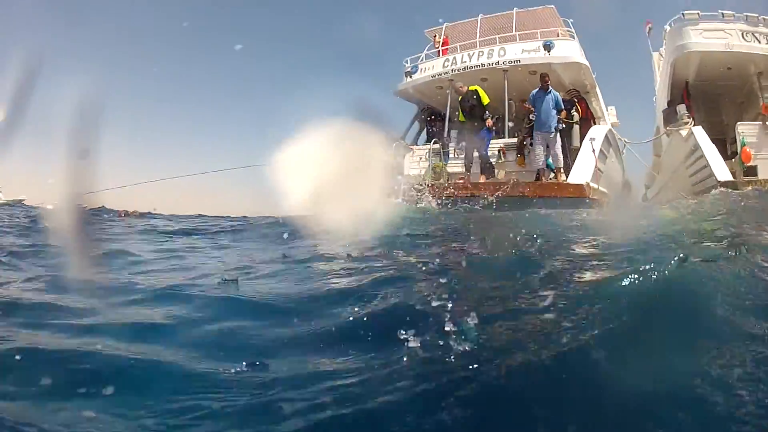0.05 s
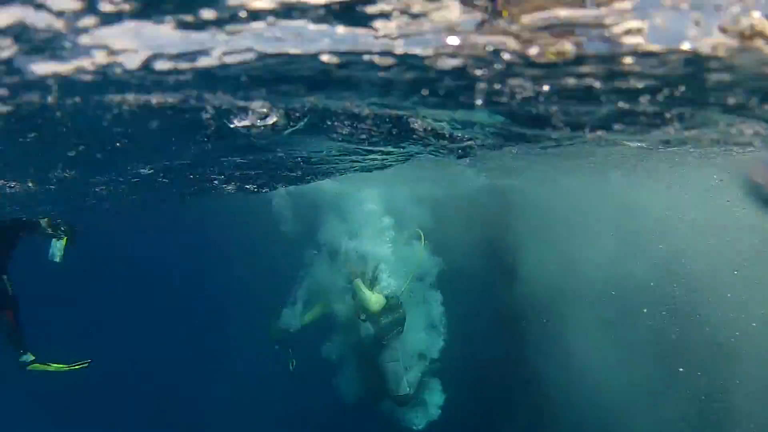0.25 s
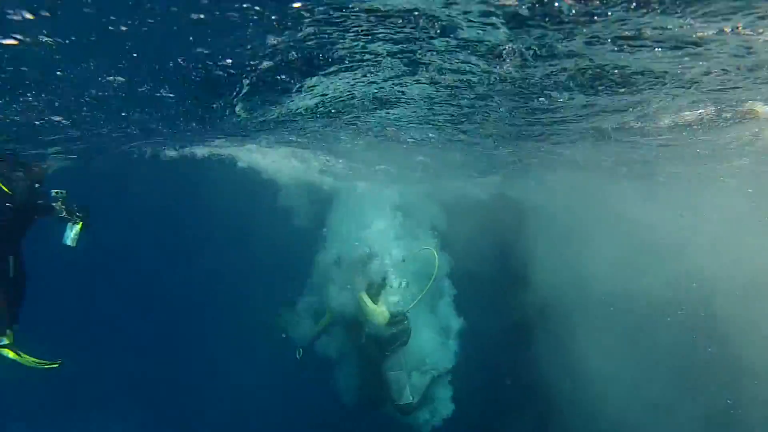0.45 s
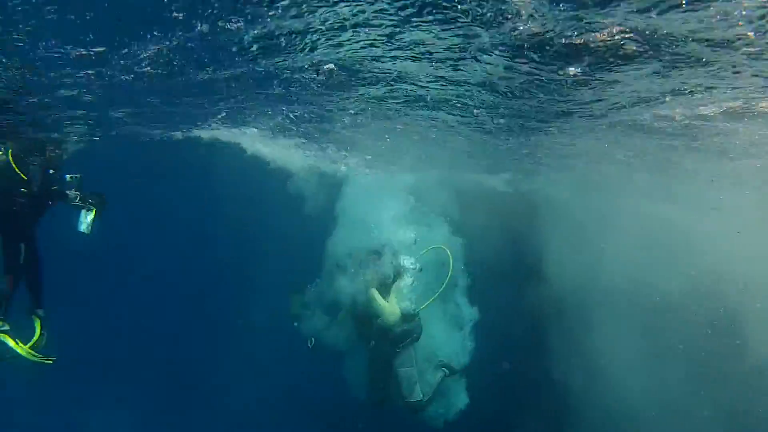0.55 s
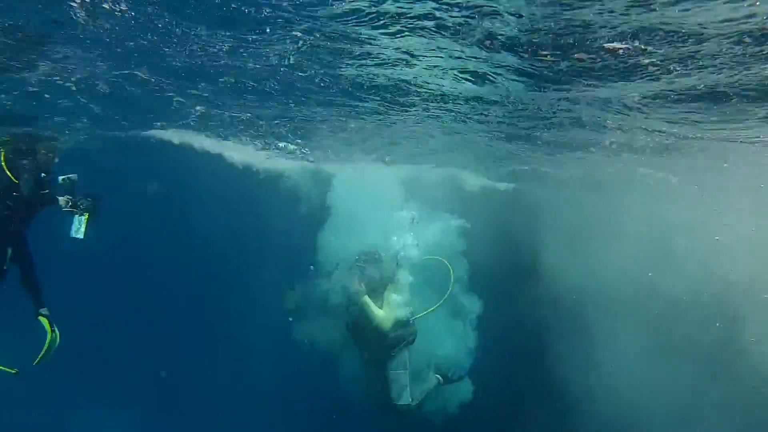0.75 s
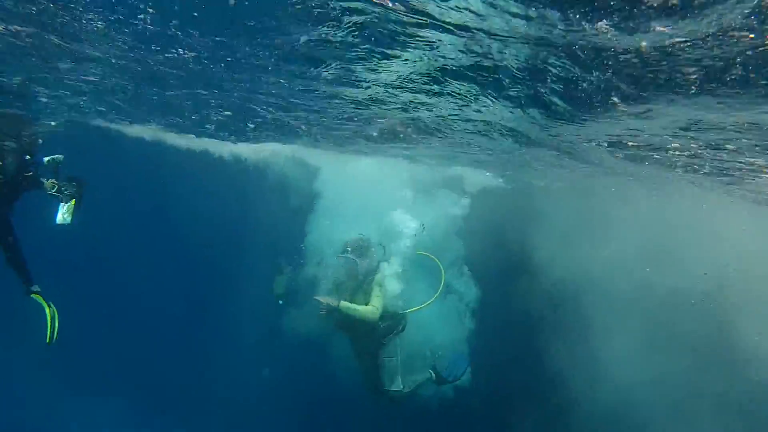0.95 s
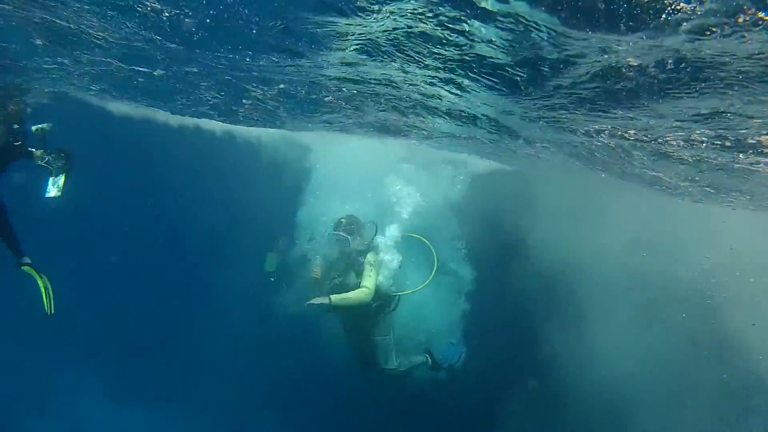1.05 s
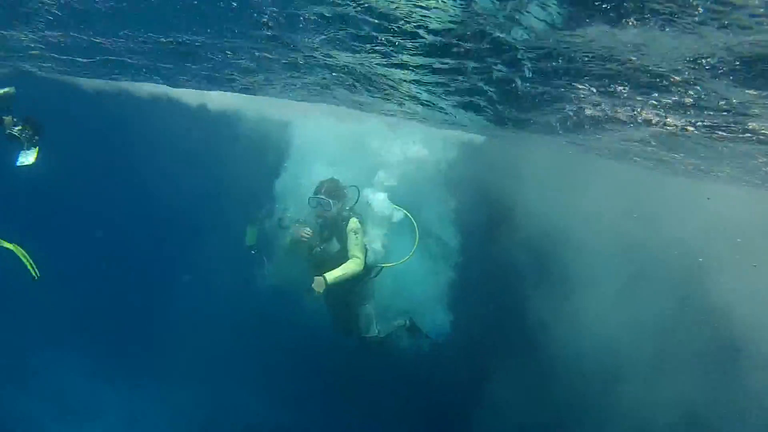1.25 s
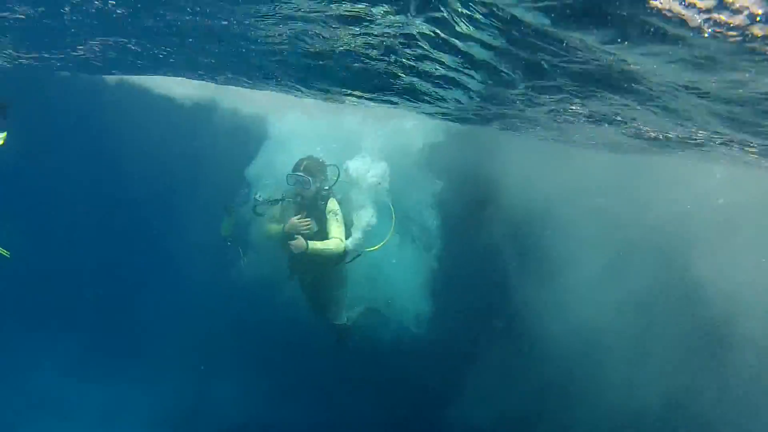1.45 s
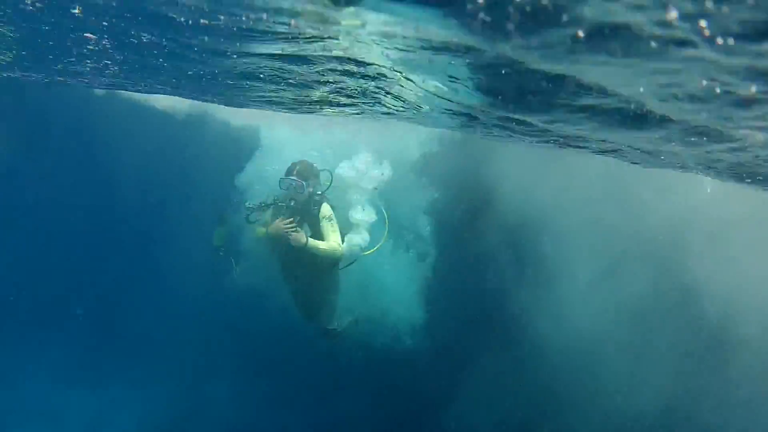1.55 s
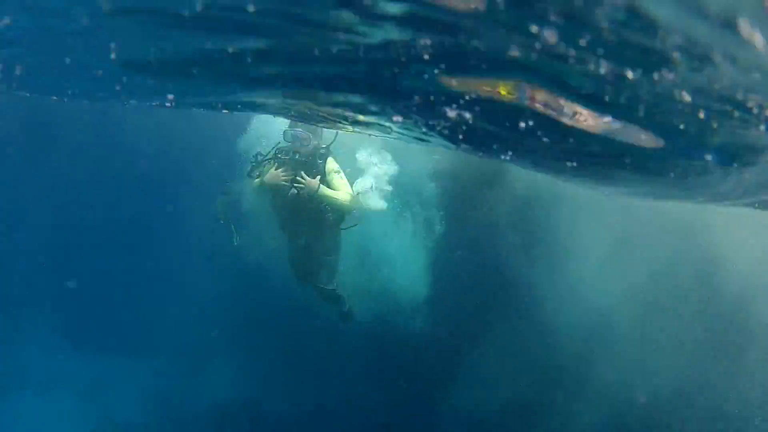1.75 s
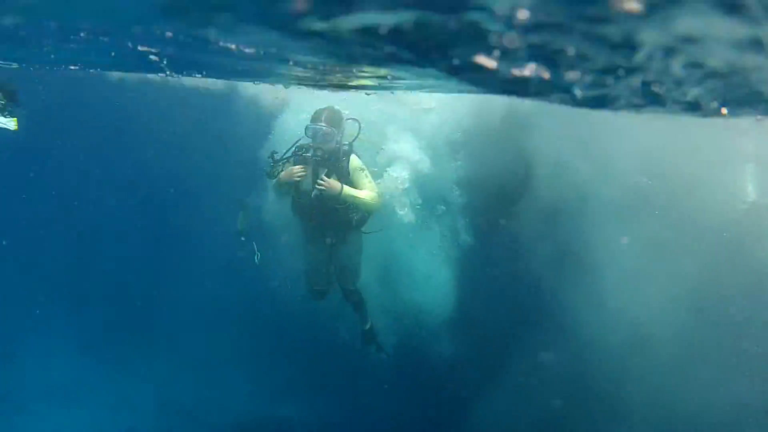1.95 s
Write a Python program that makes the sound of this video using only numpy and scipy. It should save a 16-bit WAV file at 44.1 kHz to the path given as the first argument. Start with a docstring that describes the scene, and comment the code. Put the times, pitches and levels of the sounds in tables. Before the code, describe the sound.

A splashing gurgle of sea water closes over a waterproof camera as a diver plunges in nearby. Close slaps and ringing bubbles die away into faint underwater hiss and rumble, with stray bubbles and one hollow knock.

```python
"""Underwater camera beside a diver's plunge.

A camera in a watertight housing dips under the sea as a diver plunges in nearby. Water slaps the
housing and closes over it in a gurgle of ringing air bubbles; then come a faint underwater hiss,
a few stray bubbles and one knock. The recorder's coarse sampling adds a glassy sheen."""
import sys
import numpy as np
from scipy import signal
from scipy.fft import rfft, irfft
from scipy.io import wavfile
from scipy.ndimage import map_coordinates

SR = 44100
rng = np.random.default_rng(int(sys.argv[2]) if len(sys.argv) > 2 else 0)


def pcm_store(signal):
    """Save signal as 16-bit PCM."""
    levels = np.round(np.clip(np.atleast_2d(signal), -1, 1) * 32767)
    wavfile.write(sys.argv[1], SR, levels.astype(np.int16).T)


N = 88200


def amp(db):
    """Decibels to gain."""
    return 10 ** (np.asarray(db) / 20)


def unit_rms(x):
    """x at rms 1."""
    return x / np.sqrt(np.mean(x ** 2) + 1e-20)


def decay(t, t60_s):
    """Exponential fall, 60 dB in t60_s."""
    return amp(-60 * t / t60_s)


def gain_at(colour, hz):
    """Gain of a spectrum table, interpolated on a log frequency axis."""
    knots_hz, db = np.transpose(colour)
    return amp(np.interp(np.log(hz + 1), np.log(knots_hz + 1), db))


def curves(rows):
    """One value per sample for each column after the time."""
    times_s, *columns = np.transpose(rows)
    return [np.interp(np.arange(N) / SR, times_s, column) for column in columns]


def wobble(rate_hz):
    """Smooth random curve, rate_hz knots a second."""
    knots = rng.standard_normal(int(N * rate_hz / SR) + 4)
    return map_coordinates(knots, [np.arange(N) * rate_hz / SR])


def noise(colour):
    """Coloured noise at rms 1."""
    white = rfft(rng.standard_normal(N))
    return unit_rms(irfft(white * gain_at(colour, np.fft.rfftfreq(N, 1 / SR)), N))


def add(track, start_s, sound):
    """Mix a sound into the track."""
    part = track[max(0, round(start_s * SR)):][:len(sound)]
    part += sound[:len(part)]


def bubble(hz, attack_s, t60_s, glide):
    """One air bubble swells and rings down as its pitch glides."""
    t = np.arange(int((t60_s + 2 * attack_s) * SR) + 2) / SR
    envelope = (1 - np.exp(-(t / attack_s) ** 2)) * decay(t, t60_s)
    pitch_hz = hz * (1 + glide * np.minimum(t / t60_s, 1))
    return envelope / envelope.max() * np.sin(2 * np.pi * np.cumsum(pitch_hz) / SR)


# Single bubbles: (time [s], pitch [Hz], level [dB], attack [s], t60 [s], glide [fraction of pitch])
BUBBLES = [(0.2092, 678, -23.5, 0.00068, 0.027, 0.34), (0.2376, 838, -1.5, 0.00073, 0.014, -0.21),
           (0.245, 2320, -22, 0.00059, 0.021, -0.18), (0.2457, 5040, -13.5, 0.00013, 0.0072, -0.17),
           (0.273, 737, -16, 0.00019, 0.02, 0.33), (0.2962, 2170, -10.5, 0.0006, 0.02, -0.074),
           (0.316, 2213, -6, 0.0043, 0.01, -0.1), (0.3402, 670, -4, 0.0027, 0.026, 0.044),
           (0.345, 512, -16.5, 0.0011, 0.082, -0.05), (0.3802, 377, -23.5, 0.00047, 0.14, -0.074),
           (0.383, 2050, -13, 0.011, 0.014, 0.11), (0.3859, 2990, -5, 0.00041, 0.0046, -0.12),
           (0.3915, 3730, -25.5, 0.0083, 0.02, -0.1), (0.3956, 770, -20, 0.00084, 0.01, 0.24),
           (0.4331, 678, -18.5, 0.0047, 0.034, 0.23), (0.4414, 2150, -15, 0.005, 0.014, 0.02),
           (0.46, 1920, -14, 0.0017, 0.0049, 0.16), (0.47, 1485, -20.5, 0.0068, 0.017, 0.073),
           (0.4785, 392, -20, 0.002, 0.11, -0.00032), (0.497, 1410, -22, 0.0026, 0.021, 0.051),
           (0.4972, 518.7, -17, 0.0003, 0.1, 0.059), (0.509, 416, -11, 0.0016, 0.035, -0.37),
           (0.5178, 570, -10, 0.0045, 0.014, 0.17), (0.5304, 1544, -4.5, 0.0029, 0.0063, 0.06),
           (0.5347, 868, -16, 0.00048, 0.03, 0.28), (0.5404, 3505, -15.5, 0.0011, 0.0086, 0.09),
           (0.559, 5290, -20.5, 0.0022, 0.018, -0.084), (0.56, 1426, -20, 0.00037, 0.056, -0.057),
           (0.5708, 591, -16.5, 0.0056, 0.051, 0.1), (0.5746, 426, -11.5, 0.0011, 0.07, -0.059),
           (0.6033, 510, -20, 0.00031, 0.035, 0.44), (0.6132, 3780, -19.5, 0.00033, 0.025, -0.1),
           (0.629, 650, -22, 0.00088, 0.098, 0.3), (0.6685, 670, -15, 0.00043, 0.032, -0.17),
           (0.669, 2360, -28, 0.00066, 0.016, 0.046), (0.6786, 530, -19.5, 0.008, 0.039, -0.11),
           (0.7026, 899, -16, 0.00088, 0.086, -0.0088), (0.7065, 505, -17, 0.00035, 0.036, -0.14),
           (0.7335, 2410, -21.5, 0.00028, 0.016, 0.04), (0.7592, 1610, -25, 0.0072, 0.014, 0.28),
           (0.7878, 497.6, -21, 0.0048, 0.057, 0.44), (0.793, 1280, -35, 0.006, 0.036, -0.12),
           (0.884, 447, -39.5, 0.0064, 0.11, 0.33), (0.9038, 2440, -28, 0.00046, 0.033, -0.09),
           (1.0008, 1482, -19, 0.0007, 0.065, 0.0035), (1.0003, 629, -29.5, 0.00039, 0.066, 0.098),
           (0.9992, 1747, -29.5, 0.0005, 0.085, 0.056), (1.0355, 604, -37.5, 0.0035, 0.23, -0.092),
           (1.134, 876, -42, 0.001, 0.062, 0.05), (1.5216, 575, -27, 0.0039, 0.082, 0.041),
           (1.566, 3420, -42, 0.00072, 0.0066, -0.22), (1.5844, 2900, -39.5, 0.00034, 0.0099, -0.47),
           (1.659, 1080, -44.5, 0.0004, 0.021, -0.1), (1.8885, 964, -33, 0.00059, 0.077, 0.25),
           (1.889, 3660, -39, 0.00066, 0.024, -0.0027)]
FLUTTER_HZ, FLUTTER_DB, FLUTTER_PITCH_FRACTION = 141, 2.07, 0.018


def large_bubbles():
    """Air pinches off in plops and blips that waver in level and pitch in the churning water."""
    out = np.zeros(N)
    for start_s, hz, db, attack_s, t60_s, glide in BUBBLES:
        ring = bubble(hz, attack_s, t60_s, glide)
        n = np.arange(len(ring))
        level_flutter, pitch_flutter = (map_coordinates(knots, [n * FLUTTER_HZ / SR], mode="mirror")
                                        for knots in rng.standard_normal((2, 64)))
        wavering = np.interp(n + FLUTTER_PITCH_FRACTION * np.cumsum(pitch_flutter), n, ring)
        add(out, start_s, amp(db + FLUTTER_DB * level_flutter) * wavering)
    return out


def swarm(per_s, centre_hz, log_spread, cycles):
    """Small bubbles of random size ring for roughly equal numbers of cycles; rms 1."""
    out = np.zeros(N)
    for when, pitch_rank, strength, life in rng.random((int(per_s * N / SR), 4)):
        hz = centre_hz * np.exp(log_spread * 2 * np.arcsin(2 * pitch_rank - 1) / np.sqrt(2))
        db = -5 * np.log(max(strength, .04))
        ring = bubble(hz, attack_s=1 / hz, t60_s=cycles * (.5 + life) / hz, glide=0.18)
        add(out, when * N / SR, amp(db) * ring)
    return unit_rms(out)


# Cloud of small bubbles: (time [s], gurgle level [dB], fizz level [dB])
CLOUD = [(.14, -77, -61), (.22, -49.5, -44), (.27, -42, -49), (.33, -40.5, -38), (.39, -36, -31.5),
         (.42, -34.5, -46), (.46, -35.5, -32), (.55, -28, -39), (.63, -38, -36.5), (.69, -27, -57),
         (.73, -36.5, -60.5), (.78, -37.5, -74.5), (.83, -49, -73), (1.3, -71, -75), (1.65, -57, -74),
         (2, -65.5, -68)]
# Froth spectrum: (frequency [Hz], relative density [dB])
FROTH_COLOUR = [(500, -18), (1400, 1.5), (2300, 5.5), (5500, -15)]
# Churning water spectrum: (frequency [Hz], relative density [dB])
WASH_COLOUR = [(100, -12), (400, 9), (1500, -11.5), (3000, -16.5), (5800, -6.5)]
FROTH_ROUGH_DB, WASH_ROUGH_DB = 6, 5.4


def bubble_cloud():
    """Air dragged down with the housing breaks into a frothy gurgle and fizz over a churning wash."""
    gurgle_db, fizz_db = curves(CLOUD)
    gurgle = amp(gurgle_db) * swarm(per_s=480, centre_hz=837.5, log_spread=0.374, cycles=21.8)
    froth_db = np.minimum(gurgle_db - 12.5, fizz_db + 6.5)
    froth = amp(froth_db + FROTH_ROUGH_DB * wobble(300)) * noise(FROTH_COLOUR)
    fizz = amp(fizz_db) * swarm(per_s=800, centre_hz=2740, log_spread=0.383, cycles=20)
    wash = amp(fizz_db - 3.5 + WASH_ROUGH_DB * wobble(91.96)) * noise(WASH_COLOUR)
    return gurgle + froth + fizz + wash


# Ring of the air pocket: (time [s], pitch [Hz], level [dB])
POCKET = [(.36, 353, -64), (.385, 370.8, -35), (.44, 361.3, -30.5), (.52, 389.3, -43), (.58, 420.1, -40.5),
          (.66, 423.6, -28), (.7, 475, -33.5), (.77, 487.6, -40), (.83, 526, -50)]
POCKET_FLUTTER_DB, POCKET_WANDER_FRACTION = 3.5, 0.022


def air_pocket():
    """A large air pocket, shaken by the flow, rings unsteadily and rises in pitch as it shrinks."""
    hz, db = curves(POCKET)
    t = np.arange(N) / SR
    alive = (t > POCKET[0][0]) & (t < POCKET[-1][0])
    phase = 2 * np.pi * np.cumsum(hz * (1 + POCKET_WANDER_FRACTION * wobble(70.9))) / SR
    return alive * amp(db + POCKET_FLUTTER_DB * wobble(59.94)) * np.sin(phase)


# Slaps on the housing: (time [s], relative ring level [dB], relative crack level [dB], cutoff [Hz])
SLAPS = [(.036, -45, -33, 6200), (0.147, -23.5, -21, 4530), (0.1665, -19, -20, 5050),
         (0.2395, -15, -18, 2700), (0.298, -18, -28.5, 4000), (0.3178, -30, -12.5, 5950),
         (0.3857, -23, -14.5, 5730), (0.4014, -24, -19.5, 5000), (0.4431, -29.5, -17.5, 5970),
         (0.4556, -18.5, -16.5, 4970), (.64, -26.5, -26.5, 4900), (0.5292, -11, -10, 5500),
         (0.561, -21.5, -22, 6000), (0.6427, -27, -23, 5260), (.659, -19.5, -26.5, 4000),
         (0.672, -22.5, -25, 3550), (0.704, -22, -26, 6100), (.7598, -31, -32, 2260),
         (0.7901, -30, -20, 1410), (0.839, -33, -34.5, 2580), (.904, -26, -22, 2720),
         (1.0008, -31.5, -25.5, 1470), (1.1322, -36, -36, 1880), (1.6589, -38, -39, 3520),
         (1.724, -51.5, -40, 3000), (1.88, -39, -40.5, 3060)]
# Housing modes: (frequency [Hz], level [dB], t60 [s])
HOUSING_MODES = [(420, -23.5, 0.0097), (709, -6, 0.041), (904, -8.5, 0.021), (1262, -7.5, 0.031),
                 (1857, -11, 0.025), (2082, -5.5, 0.027), (2440, -27.5, 0.029), (2887, -32, 0.023),
                 (3600, -15.5, 0.018)]
SLAP_LOW_HZ = 260  # the slaps carry little below this


def slaps():
    """Each slap is a short crack that rings the housing; a soft contact dulls both."""
    out, t = np.zeros(N), np.arange(SR // 10) / SR
    for start_s, ring_db, crack_db, cutoff_hz in SLAPS:
        ring = np.zeros(len(t))
        for hz, db, t60_s in HOUSING_MODES:
            gain = amp(db + rng.normal(0, 2))
            detuned_hz = hz * (1 + rng.normal(0, 0.033))
            ring += gain * decay(t, t60_s) * np.sin(2 * np.pi * detuned_hz * t)
        crack = 2 * rng.standard_normal(len(t)) * decay(t, t60_s=0.008)
        softness = signal.butter(8, cutoff_hz, fs=SR, output="sos")
        add(out, start_s, signal.sosfilt(softness, amp(ring_db) * ring + amp(crack_db) * crack))
    return signal.sosfilt(signal.butter(2, SLAP_LOW_HZ, "highpass", fs=SR, output="sos"), out)


# Dull pushes of water: (time [s], relative level [dB])
PUSHES = [(.167, -30.5), (0.211, -29.5), (.238, -7), (.273, -20), (0.2964, -11.5), (0.3188, -10.5),
          (0.344, -5.5), (0.365, -18), (0.379, -20), (0.532, -15), (0.5622, -14.5), (0.575, -23.5),
          (0.626, -20.5), (0.671, -14), (0.704, -16.5), (1.528, -19.5), (1.546, -31)]
PUSH_TAU_S, PUSH_SWING_RATIO = 0.00043, 0.81


def pushes():
    """Water pushes on the housing: a quick pressure pulse and a slower swing back, with no ring."""
    out = np.zeros(N)
    age = np.arange(SR // 20) / SR / PUSH_TAU_S
    pulse = age * np.exp(1 - age)
    swing = PUSH_SWING_RATIO * age / 4 * np.exp(1 - age / 2)
    for start_s, db in PUSHES:
        add(out, start_s, amp(db) * (swing - pulse))
    return out


# Spray ticks: (time [s], level [dB])
SPRAY = [(0.2858, -16), (0.2897, -15.5), (0.3183, -13), (0.333, -25), (.336, -21), (.386, -23.5),
         (0.399, -22.5), (.447, -14.5), (0.4529, -15), (.508, -22), (0.556, -29), (0.6294, -24),
         (1.585, -47), (1.595, -47.5), (1.87, -45.5), (1.922, -47)]
SPRAY_BAND_HZ = 3500, 5900


def spray():
    """Flung drops and bursting bubbles tick on the housing with thin, bright cracks."""
    out, t = np.zeros(N), np.arange(SR // 20) / SR
    band = signal.butter(2, SPRAY_BAND_HZ, "bandpass", fs=SR, output="sos")
    for start_s, db in SPRAY:
        hiss = unit_rms(signal.sosfilt(band, rng.standard_normal(len(t))))
        add(out, start_s, amp(db) * hiss * decay(t, t60_s=0.011))
    return out


# Knock modes: (frequency [Hz], level [dB], t60 [s])
KNOCK_MODES = [(386, -31, 0.0089), (716, -19, 0.026), (863, -26.5, 0.031), (1950, -18.5, 0.013),
               (2821, -23.5, 0.014), (3580, -27, 0.017)]
KNOCK_AT_S, KNOCK_RISE_S = 1.5277, 0.0002


def knock():
    """One hollow knock as a bubble bursts; the water damps its modes at once."""
    out, t = np.zeros(N), np.arange(SR // 10) / SR
    ring = sum(amp(db) * decay(t, t60_s) * np.sin(2 * np.pi * hz * t) for hz, db, t60_s in KNOCK_MODES)
    add(out, KNOCK_AT_S, ring * (1 - np.exp(-(t / KNOCK_RISE_S) ** 2)))
    return out


# Flow rumble: (time [s], level [dB])
FLOW_LEVEL = [(0, -57.5), (.17, -53), (.29, -42), (.36, -33), (.43, -40.5), (.55, -46), (.7, -40.5),
              (.78, -53), (1.45, -54), (1.68, -50), (2, -53.5)]
# Flow spectrum: (frequency [Hz], relative density [dB])
FLOW_COLOUR = [(20, 1), (45, 3), (90, -2), (160, -4.5), (300, -14), (600, -36), (1500, -36.5)]
# Underwater hiss: (time [s], level [dB])
HISS_LEVEL = [(0, -67), (.3, -82), (.9, -55), (1.22, -51), (1.45, -56.5), (1.7, -61), (2, -60)]
# Hiss spectrum: (frequency [Hz], relative density [dB])
HISS_COLOUR = [(100, -25), (300, -4.5), (520, 0.5), (660, -0.5), (850, -9.5), (1600, -16), (2400, -4),
               (3100, -16.5), (3600, -9.5), (4300, -19.5), (5800, -16)]
# Spectrum of waves above the surface: (frequency [Hz], relative density [dB])
WAVES_COLOUR = [(100, -34), (300, -1.5), (850, -3.5), (1400, -22), (2200, 4.5), (3500, -9.5), (5800, -7.5)]
WAVES_DB, DIP_AT_S, DIP_FADE_S = -48.5, 0.178, 0.038


def sea():
    """Waves in open air give way to underwater hiss; flow round the housing rumbles throughout."""
    (flow_db,), (hiss_db,) = curves(FLOW_LEVEL), curves(HISS_LEVEL)
    flow = amp(flow_db + 1.5 * wobble(25.16)) * noise(FLOW_COLOUR)
    hiss = amp(hiss_db + 2.6 * wobble(29.91)) * noise(HISS_COLOUR)
    above_surface = np.clip((DIP_AT_S - np.arange(N) / SR) / DIP_FADE_S + 1, 0, 1)
    waves = above_surface * amp(WAVES_DB) * noise(WAVES_COLOUR)
    return flow + hiss + waves


def scene():
    """Everything reaches one microphone inside the housing."""
    bubbles = large_bubbles() + bubble_cloud() + air_pocket()
    contacts = slaps() + pushes() + spray() + knock()
    return (bubbles + contacts + sea())[None]


# Recorder input filter: (frequency [Hz], gain [dB])
INPUT_FILTER = [(15, -21.5), (30, -5.5), (55, -2), (3000, 0.5), (4500, -2), (5400, -4.5), (6000, -12)]
CEILING, HOLD_HZ, LOWPASS_HZ, STOP_HZ = 0.86, 12000, 15100, 16400


def record(dry):
    """The recorder rounds off peaks and holds samples, mirroring the sound faintly around HOLD_HZ."""
    saturated = dry / (1 + (dry / CEILING) ** 4) ** (1 / 4)
    size = SR * (N // SR + 1)
    hz = np.fft.rfftfreq(size, 1 / SR)
    offset_hz = hz - HOLD_HZ * np.round(hz / HOLD_HZ)
    source_hz = np.abs(offset_hz)
    source = rfft(saturated, size)[:, np.round(source_hz * size / SR).astype(int)]
    mirrored = np.where(offset_hz < 0, -np.conj(source), source)
    hold_droop = source_hz / np.maximum(hz, 1)
    held = mirrored * gain_at(INPUT_FILTER, source_hz) * hold_droop
    lowpass = (hz < STOP_HZ) / np.sqrt(1 + (hz / LOWPASS_HZ) ** 90)
    return irfft(held * lowpass, size)[:, :N]


dry = scene()
out = record(dry)
pcm_store(out)
```